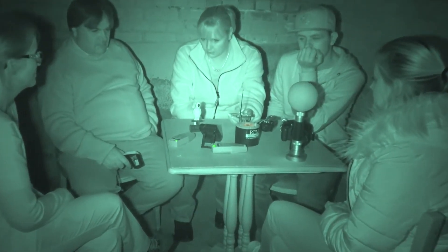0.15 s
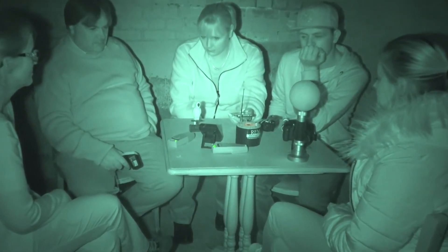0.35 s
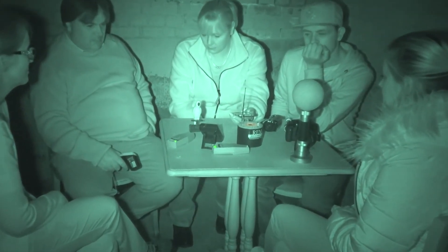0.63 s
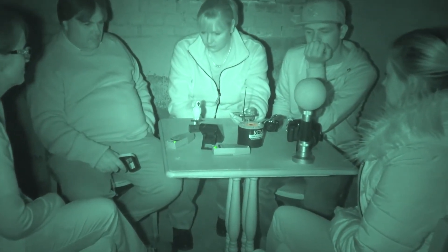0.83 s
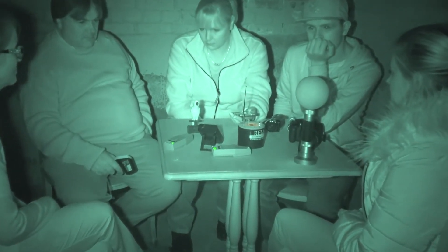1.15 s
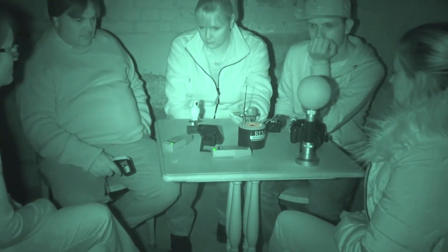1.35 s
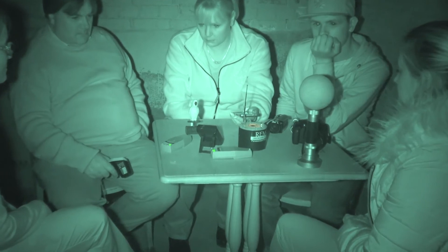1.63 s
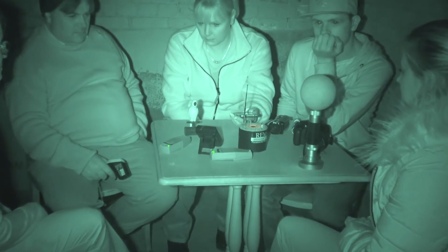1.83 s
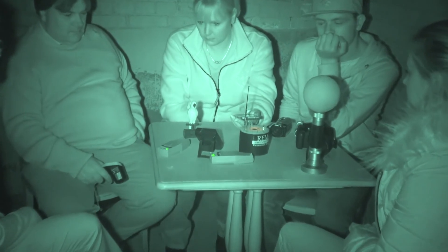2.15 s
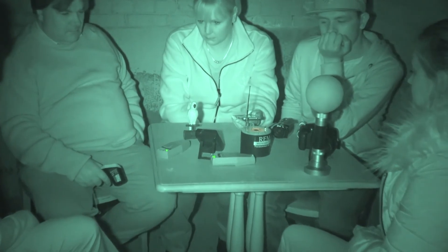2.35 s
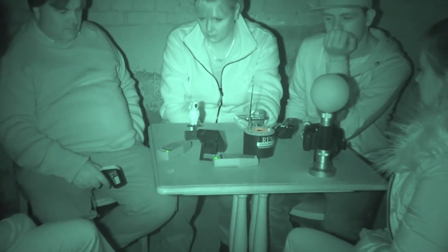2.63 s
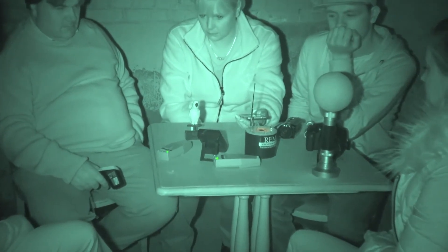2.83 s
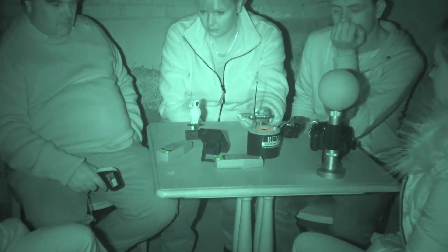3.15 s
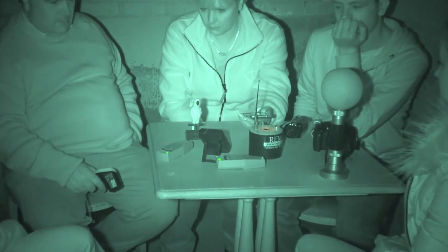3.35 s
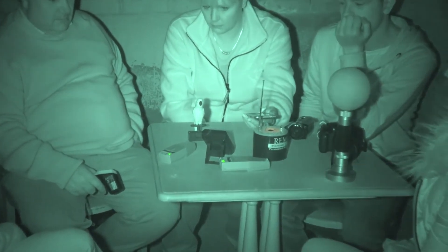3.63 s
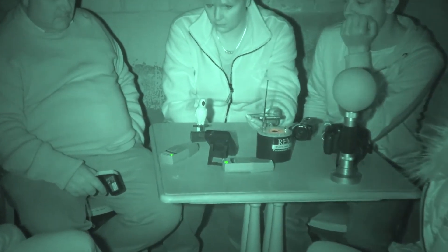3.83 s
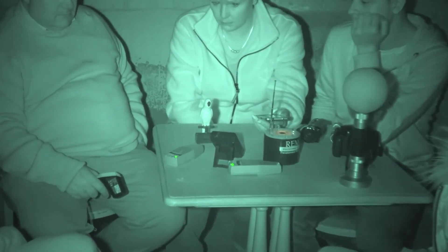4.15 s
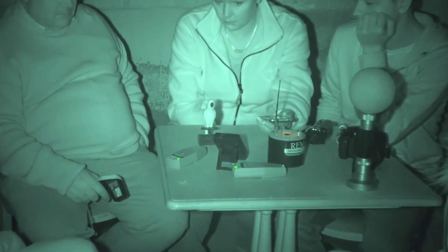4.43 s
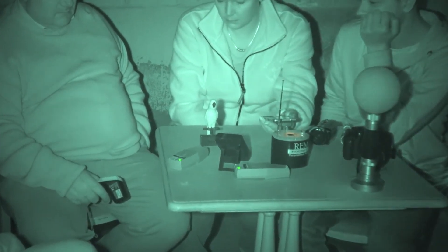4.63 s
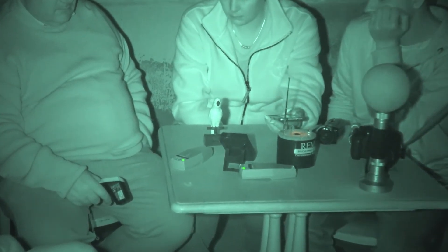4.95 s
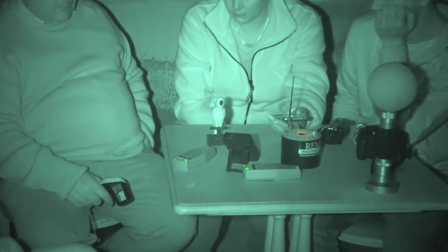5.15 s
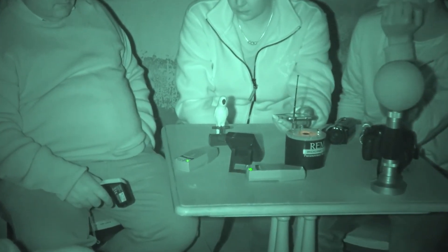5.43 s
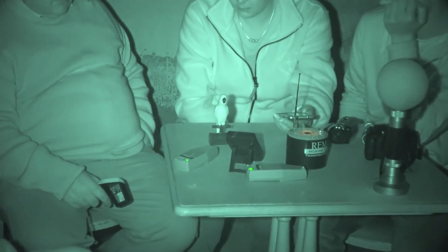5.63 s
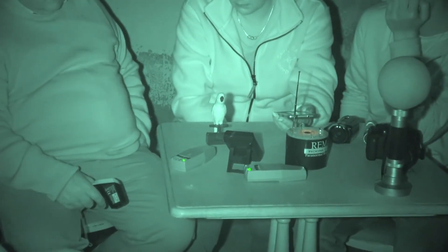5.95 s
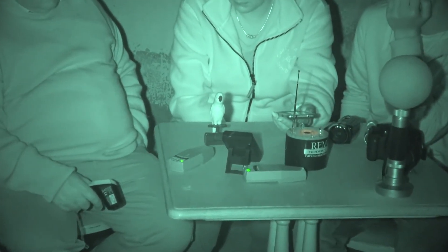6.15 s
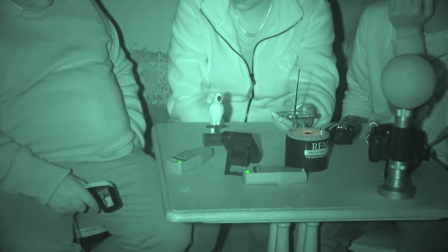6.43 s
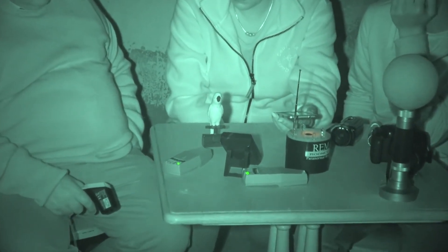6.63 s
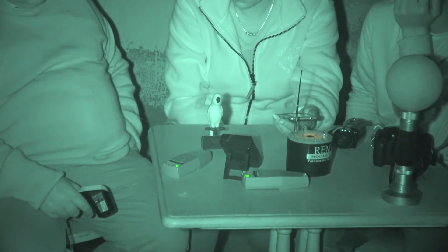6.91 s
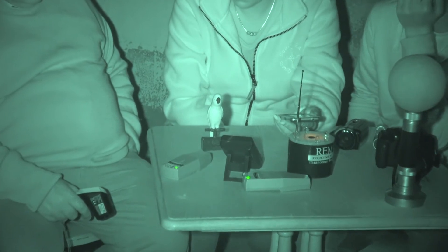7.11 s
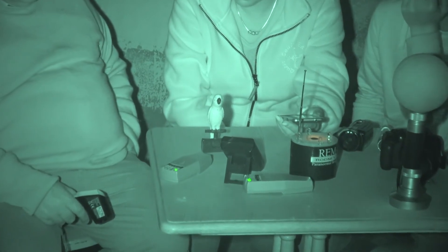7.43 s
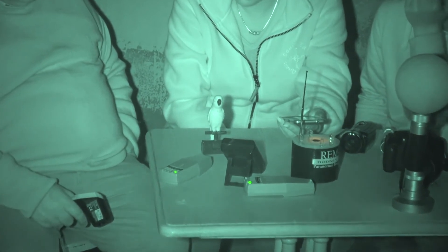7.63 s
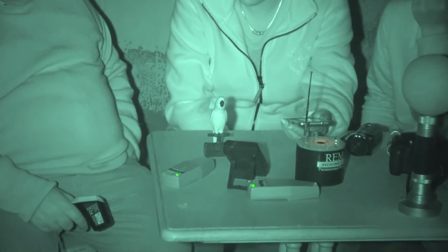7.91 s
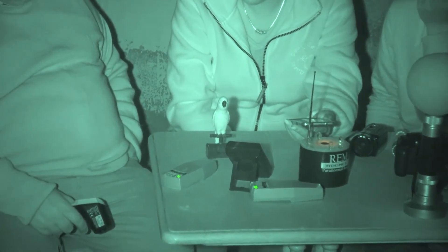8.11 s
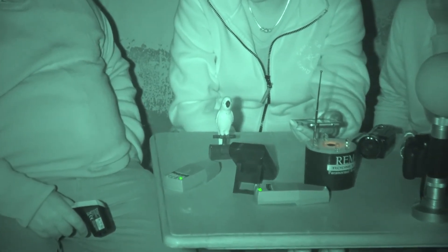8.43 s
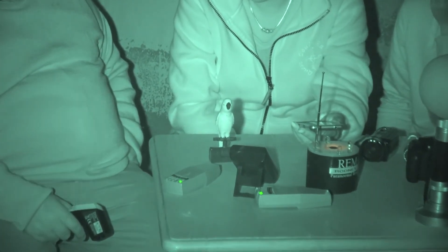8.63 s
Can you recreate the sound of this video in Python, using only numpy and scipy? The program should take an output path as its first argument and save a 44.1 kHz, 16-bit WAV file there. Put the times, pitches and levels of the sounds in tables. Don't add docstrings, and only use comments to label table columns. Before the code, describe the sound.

In a nearly silent brick cellar, a low mains hum and distant machine rumble swell and ease beneath soft ventilation and fine hiss. Faint cloth brushes and tiny ticks lead into a very short rubber squeak, falling in pitch. About a second later a hollow plastic latch snaps sharply, clearly the loudest event, followed by small ticks and light clothing rustle. Close stereo microphones, centred bass, wider treble.

```python
import sys
import numpy as np
from scipy import signal
from scipy.fft import rfft, irfft, next_fast_len
from scipy.io import wavfile
from scipy.ndimage import uniform_filter1d

SR = 44100
rng = np.random.default_rng(int(sys.argv[2]) if len(sys.argv) > 2 else 0)


def wav_record(signal):
    frames = np.transpose(np.atleast_2d(signal))
    bounded = np.clip(frames, -1, 1)
    quanta = np.round(bounded * 32767).astype(np.int16)
    wavfile.write(sys.argv[1], SR, quanta)


def boost_factor(decibels):
    exponent = np.asarray(decibels, float) / 20
    return 10 ** exponent


N = 387013

# start_s, gain_db
RECORDER_GAIN = [(0, 1.5), (1.2, -.5), (3, 0.5), (5, -0.2), (6.4, -1.5), (7.4, -2), (8, -3), (8.78, -3.5)]
# freq_hz, side_minus_mid_db
SIDE_SPREAD = [(60, -46), (110, -50), (200, -30), (380, -11), (700, -8.5), (1290, -3.5), (2380, 0),
               (4400, -2.5), (8120, -6.5), (11000, -10.5), (15000, -26)]
# pitch_hz, level_db, waver_db
HUM_TONES = [(41.66, -57, -0.5), (100.02, -47, 1), (161.2, -63, 5.5), (199.6, -60, 0), (219.8, -53.5, 0.5),
             (238.7, -71, 6), (387.3, -72.5, 2), (543, -80, 4.5)]
# pitch_hz, width_hz, level_db
ROOM_MODES = [(12.6, 3, -1.5), (24, 1.9, -19), (37.7, 30, -20), (53.2, 3.3, -15), (105.25, 7.7, 2.5),
              (113, 8.2, -0.5), (129.6, 15, -11.5), (139.2, 9.3, -15.5), (143, 5.9, -5), (161.4, 24, -12),
              (177, 16.3, -12), (203.3, 32, -15.5), (238.7, 33, -20), (288, 7.8, -27.5)]
# peak_s, extra_db
RUMBLE_SURGES = [
    (0.05, 7),
    (.7, 0),
    (1.6, 12.5),
    (2.5, 6),
    (4.17, 11),
    (5.1, 5.5),
    (5.6, 8),
    (8.0, 7),
]
# freq_hz, density_db_per_hz
AIR_COLOUR = [(150, -45), (250, -4), (312, 0), (358, -9), (384, -7), (441, -12.5), (538, -8.5), (618, -14),
              (694, -10), (1010, -17.5), (1150, -14), (1320, -22), (4000, -36.5), (5200, -49), (8800, -120)]
# freq_hz, density_db_per_hz
HISS_COLOUR = [(800, -19), (2500, -3.5), (5000, 3), (9000, 1.5), (13000, 0.5), (15300, -2)]
# peak_s, rise_s, fall_s,
# level_db, extra_treble_db
CLOTH_STROKES = [(.07, .08, .1, -74, -18), (2.489, .003, 0.027, -79, 13), (2.7, .03, 0.039, -72.5, 11),
                 (2.76, 0.011, 0.02, -72, 7), (4.33, 0.028, .05, -75, 1), (4.38, 0.017, .09, -65, -11),
                 (4.555, .04, .06, -71.5, 3), (4.66, .08, .022, -70.5, 4), (5.85, .2, .15, -78, -10),
                 (6.97, .06, .1, -75.5, 1), (7.14, .08, 0.066, -72.5, 0), (7.25, 0.033, 0.092, -72.5, 0),
                 (7.43, .04, .12, -75, 0)]
# freq_hz, density_db_per_hz
CLOTH_COLOUR = [(1200, 1.5), (2800, 2), (4500, -2.5), (6300, -1), (8500, -4.5), (12000, -7.5), (16000, -13)]
# start_s, peak_db, ring_hz, width_share_of_ring, t60_s
TICK_CONTACTS = [(2.452, -70, 3180, .03, .06), (2.487, -55, 8600, .1, .01), (2.4868, -54, 14000, .1, .01),
                 (2.4868, -59, 6500, .55, .008), (2.758, -68, 5750, .04, .04),
                 (2.758, -54, 2350, 0.25, .04), (3.65, -57.5, 6900, .07, .01),
                 (3.858, -55, 7600, .55, .012), (3.861, -59, 10300, .07, 0.049),
                 (3.859, -61, 4330, .1, .015), (3.879, -65, 4600, .049, .016)]
# time_s, slip_rate_hz, level_db
SQUEAK_GLIDE = [
    (2.638, 3770, -62),
    (2.652, 3440, -58),
    (2.665, 3510, -52),
    (2.675, 3370, -69),
    (2.687, 3160, -51),
    (2.7, 2900, -53.5),
    (2.722, 2600, -60),
    (2.74, 2120, -67),
    (2.76, 1280, -76),
]
# multiple_of_slip_rate, level_db
SLIP_HARMONICS = [(1, 1.5), (2, -9.5), (3, -21), (4, -15)]
# freq_hz, gain_db
SOLE_COLOUR = [(1000, 10), (3000, -0.5), (4300, -0.5), (5500, -9), (7200, 5.5), (9000, 7), (14000, -6)]
# start_s, crack_db, body_db
LATCH_SNAP = (3.58725, -13.5, -35)
# delay_s, level_db
TONGUE_BOUNCES = [
    (.00014, -2.5),
    (.00038, -5),
    (.00074, -6),
]
# freq_hz, density_db_per_hz
CRACK_COLOUR = [(300, -29), (900, -20), (2200, -3.5), (3000, -18), (3700, -8), (4800, -7), (6900, 9),
                (8200, 6), (9200, -5), (11000, 6), (12700, -3), (15000, -11), (15400, -19), (16200, -10),
                (16500, -40)]
# freq_hz, left_minus_right_db
LATCH_BALANCE = [(60, -0.5), (150, 0.0), (380, 0.0), (950, 8), (2380, 5), (5980, 5), (15000, -3.5)]
# pitch_hz, level_db, t60_s
LATCH_BODY = [(338, -8, 0.033), (704, -26, 0.017), (880, -30, 0.0084), (1150, 3.5, 0.034),
              (1330, 3.5, 0.019), (1540, -1, 0.023), (1860, -12, 0.011), (2400, 1, 0.011),
              (2900, -14, 0.022), (3950, -13, 0.008)]
# freq_hz, t60_s
CELLAR_DECAY = [(500, 0.06), (2000, 0.099), (6000, 0.12), (12000, 0.028)]


def evened(x):
    return x / np.sqrt(np.mean(x ** 2) + 1e-20)


def read(points, hz):
    f, value = np.transpose(points)
    return np.interp(np.log(hz + 1), np.log(f + 1), value)


def add(mix, s, sound):
    part = mix[..., round(s * SR):][..., :sound.shape[-1]]
    part += sound[..., :part.shape[-1]]


def gain_db():
    return np.interp(np.arange(N) / SR, *np.transpose(RECORDER_GAIN))


def diffuse(shape):
    size = next_fast_len(N)
    hz = np.fft.rfftfreq(size, 1 / SR)
    spectrum = rfft(rng.standard_normal((2, size))) * shape(hz)
    spread = np.array([np.ones(len(hz)), boost_factor(read(SIDE_SPREAD, hz))])
    mid, side = irfft(spectrum * spread, size)[:, :N]
    return np.array([mid + side, mid - side]) / mid.std()


def slow(top_hz):
    t = np.arange(0, N + 256, 256) / SR
    walk = sum(np.sin(2 * np.pi * (f * t + rng.random())) for f in np.geomspace(.1, top_hz, num=16))
    return np.interp(np.arange(N) / SR, t, evened(walk))


def mode(f, hz, width_hz, db):
    return boost_factor(db) / (1 + (2 * (f - hz) / width_hz) ** 2)


def hum():
    t = np.arange(N) / SR
    tones = np.zeros(N)
    for hz, db, waver_db in HUM_TONES:
        level = boost_factor(db + waver_db * slow(1.5)) * np.sqrt(2)
        tones += level * np.sin(2 * np.pi * (hz * t + rng.random()))
    boom = diffuse(lambda f: np.sqrt(sum(mode(f, *row) ** 2 for row in ROOM_MODES)))
    surge_s = 0.3
    surge_db = sum(db * np.exp(-((t - s) / surge_s) ** 2) for s, db in RUMBLE_SURGES)
    rumble = boost_factor(-55.5 + surge_db) * diffuse(lambda f: mode(f, hz=66.0, width_hz=5.0, db=0))
    return boost_factor(gain_db()) * (boost_factor(-43.5) * boom + rumble + boost_factor(1.4) * tones)


def air():
    wash_follow, hiss_follow = 0.87, 0.78
    wash = diffuse(lambda f: boost_factor(read(AIR_COLOUR, f)))
    hiss = diffuse(lambda f: boost_factor(read(HISS_COLOUR, f)))
    return boost_factor(-56 + wash_follow * gain_db()) * wash + boost_factor(-71.5 + hiss_follow * gain_db()) * hiss


def cloth():
    t = np.arange(N) / SR
    stroke, fast = np.zeros(N), np.zeros(N)
    for s, rise_s, fall_s, level_db, treble_db in CLOTH_STROKES:
        shape = np.where(t < s, ((s - t) / rise_s) ** 2, ((t - s) / fall_s) ** 2)
        power = boost_factor(2 * level_db) * np.exp(-shape)
        stroke += power
        fast += power * boost_factor(2 * treble_db)
    grain_db = 1.3 * evened(uniform_filter1d(rng.standard_normal(N), 150))
    fibres = diffuse(lambda f: boost_factor(read(CLOTH_COLOUR, f)))
    split_hz = 7000
    dull = signal.lfilter(*signal.butter(2, split_hz, fs=SR), fibres)
    sizzle = signal.lfilter(*signal.butter(2, split_hz, "high", fs=SR), fibres)
    return boost_factor(grain_db + 0.4) * (np.sqrt(stroke) * dull - np.sqrt(fast) * sizzle)


def ticks():
    t, out = np.arange(2000) / SR, np.zeros((2, N))
    for s, peak_db, hz, width, t60 in TICK_CONTACTS:
        edges_hz = [hz * (1 - width), min(hz * (1 + width), SR / 2 - 1)]
        band = signal.butter(2, edges_hz, "bandpass", fs=SR)
        ring = signal.lfilter(*band, rng.standard_normal(len(t)) * boost_factor(-60 * t / t60))
        side_db = rng.uniform(-1.5, 1.5) * np.array([[1], [-1]])
        add(out, s, ring / abs(ring).max() * boost_factor(peak_db + 4.5 + side_db))
    return out


def squeak():
    s, *columns = np.transpose(SQUEAK_GLIDE)
    t = np.arange(s[0], s[-1], 1 / SR)
    hz, level_db = (np.interp(t, s, c) for c in columns)
    uneven_hz, uneven_width_hz = 2740, 170
    uneven = 0.59 * np.exp(-((hz - uneven_hz) / uneven_width_hz) ** 2)
    sharp_db = 0.5 + 11 * np.log2(hz / 3530)
    jitter, flutter = rng.standard_normal((len(t), 2)).T
    hz = uniform_filter1d(hz, size=300) * (1 + .004 * evened(uniform_filter1d(jitter, 60)))
    phase = 2 * np.pi * np.cumsum(hz) / SR

    def line(k):
        return boost_factor(read(SOLE_COLOUR, k * hz) + sharp_db * np.log2(k)) * np.sin(k * phase)

    slips = sum(boost_factor(db) * (line(k) + uneven * line(k + 1 / 2)) for k, db in SLIP_HARMONICS)
    level_db = level_db + .8 * evened(uniform_filter1d(flutter, 150))
    return np.sqrt(2) * boost_factor(level_db) * slips * signal.windows.tukey(len(t), .04)


def latch():
    s, crack_db, body_db = LATCH_SNAP
    t, out = np.arange(4096) / SR, np.zeros((2, N))
    half_sides = np.array([[.5], [-.5]])
    bins_hz = abs(np.fft.fftfreq(len(t), 1 / SR))
    log_gain = np.log(boost_factor(read(CRACK_COLOUR, bins_hz) + read(LATCH_BALANCE, bins_hz) * half_sides))
    colour = np.fft.ifft(np.exp(np.conj(signal.hilbert(log_gain)))).real
    both, left, right = rng.standard_normal((len(t), 3)).T
    grit = both + 0.4 * np.array([left, right])
    scatter = signal.lfilter(*signal.butter(2, 7000, fs=SR), grit[:, ::-1])
    rattle = grit * boost_factor(-25 - 60 * t / 0.01) + scatter * boost_factor(-46 - 60 * t / 0.036)
    rattle[:, 0] = 1
    for k, (delay_s, db) in enumerate(TONGUE_BOUNCES):
        rattle[:, round(delay_s * SR)] = (-1) ** (k + 1) * boost_factor(db)
    crack = signal.fftconvolve(rattle, colour / abs(colour).max(), axes=1)[:, :len(t)]
    body = sum(boost_factor(db - 60 * t / t60) * np.sin(2 * np.pi * hz * t) for hz, db, t60 in LATCH_BODY)
    add(out, s, boost_factor(body_db + 2.5 * half_sides) * body - boost_factor(crack_db) * crack)
    return out


def cellar(x):
    first, spacing = 120, 20
    taps = np.zeros((2, SR // 2))
    at = np.arange(first, SR // 2 - spacing, spacing)
    at = at + rng.integers(0, spacing, (2, len(at)))
    np.put_along_axis(taps, at, rng.choice([-1., 1.], at.shape), 1)
    hz, t, z = signal.stft(taps, SR, nperseg=256)
    decay = boost_factor(-60 * t / read(CELLAR_DECAY, hz)[:, None])
    tail = signal.istft(z * decay, SR, nperseg=256)[1]
    tail[:, :first] = 0
    return signal.fftconvolve(x[None], tail / np.linalg.norm(tail[0]), axes=1)[:, :N]


def scene():
    room = cloth() + hum() + air()
    small = ticks()
    small = small + boost_factor(-9) * cellar(small.mean(0))
    sole = np.zeros(N)
    add(sole, SQUEAK_GLIDE[0][0], squeak())
    sole = np.array([boost_factor(-.8) * sole, boost_factor(.4) * sole]) + boost_factor(-8.5) * cellar(sole)
    snap = latch()
    walls = signal.lfilter(*signal.butter(2, 3000, fs=SR), snap.mean(0))
    edge = signal.ellip(10, .1, 45, 15480, fs=SR, output="sos")
    faint = signal.sosfiltfilt(edge, sole + small + room)
    return faint + snap + boost_factor(-11.5) * cellar(walls)


def roll_off(x):
    return signal.sosfilt(signal.butter(12, 16460, fs=SR, output="sos"), x)


def record(dry):
    return roll_off(dry)


dry = scene()
out = record(dry)
wav_record(out)
```